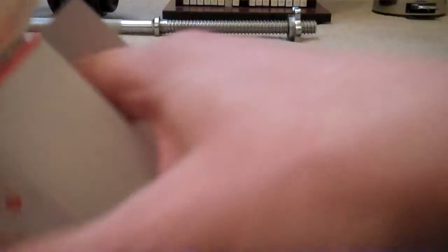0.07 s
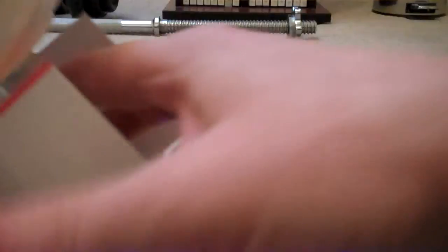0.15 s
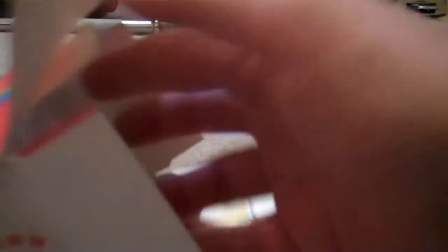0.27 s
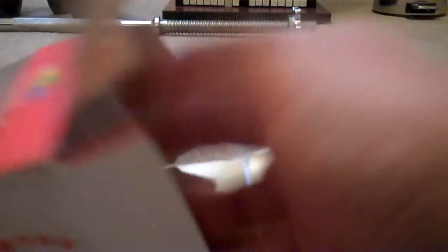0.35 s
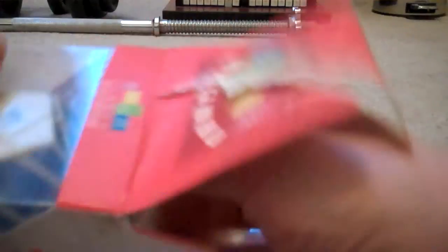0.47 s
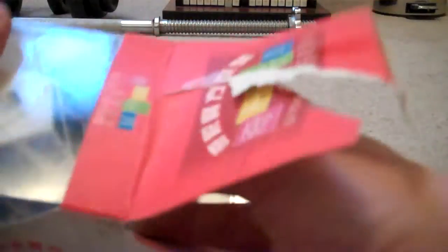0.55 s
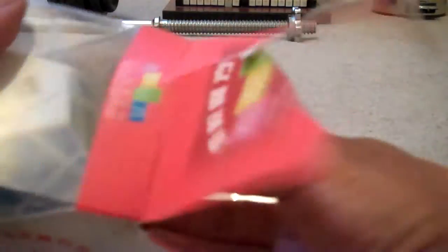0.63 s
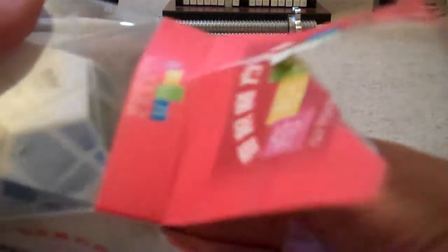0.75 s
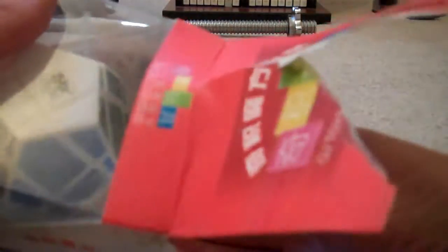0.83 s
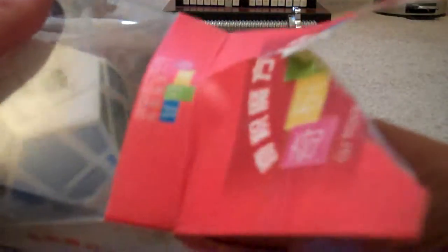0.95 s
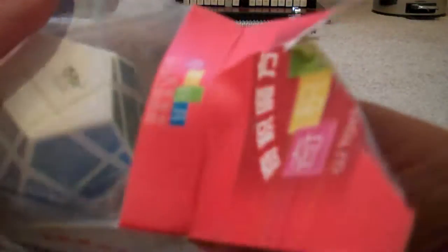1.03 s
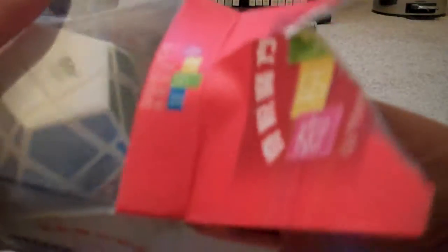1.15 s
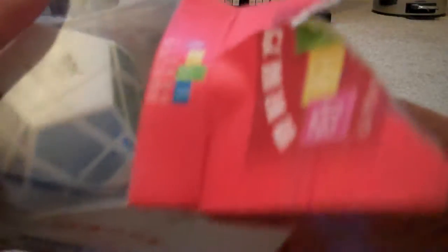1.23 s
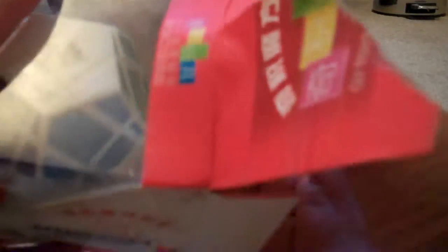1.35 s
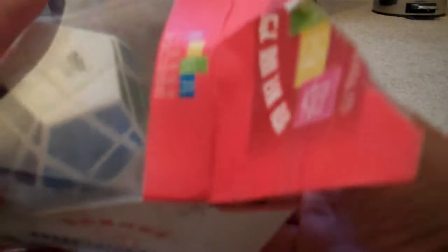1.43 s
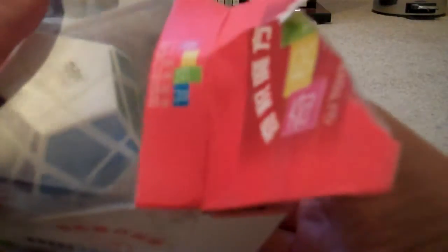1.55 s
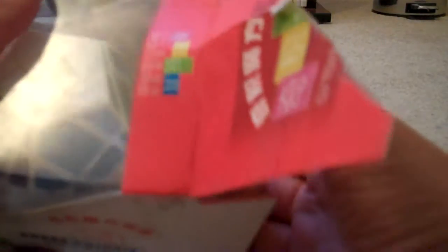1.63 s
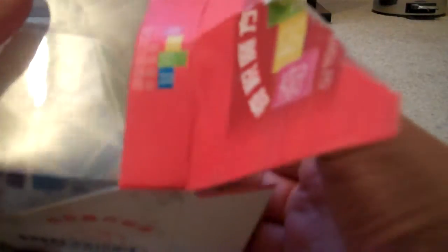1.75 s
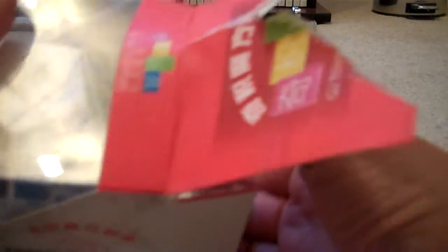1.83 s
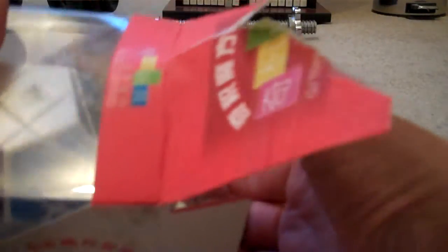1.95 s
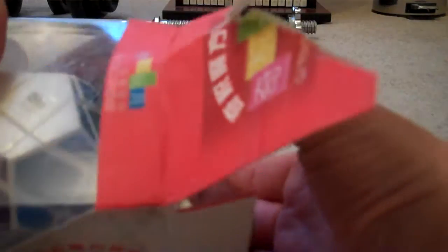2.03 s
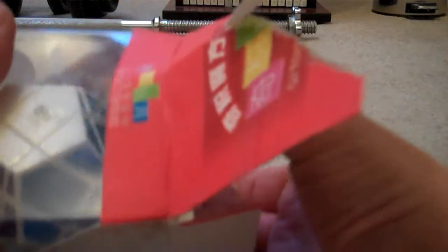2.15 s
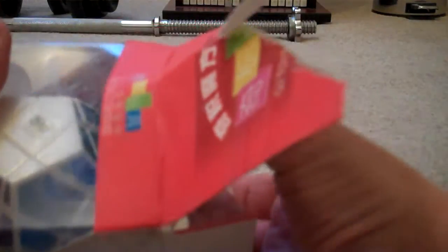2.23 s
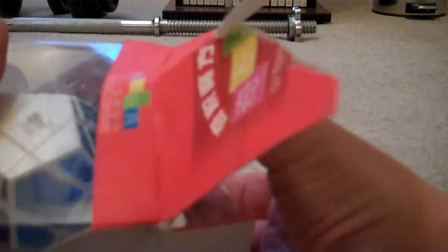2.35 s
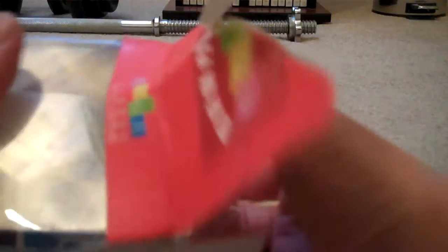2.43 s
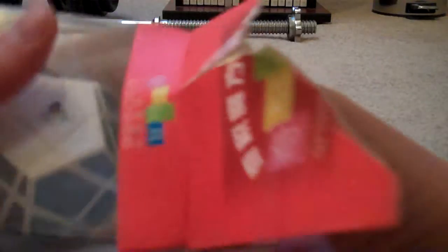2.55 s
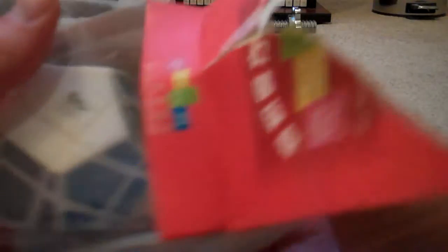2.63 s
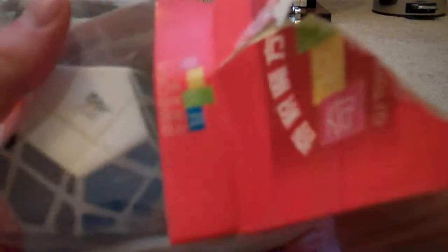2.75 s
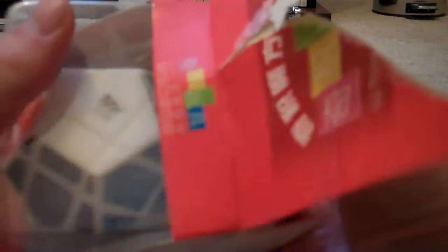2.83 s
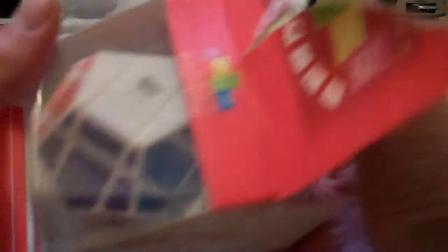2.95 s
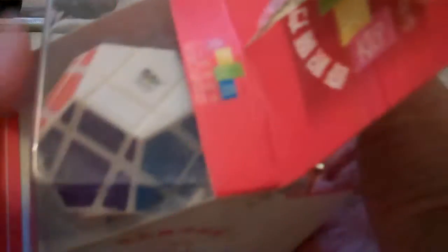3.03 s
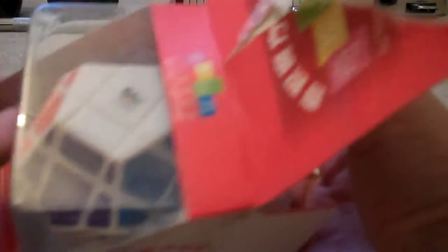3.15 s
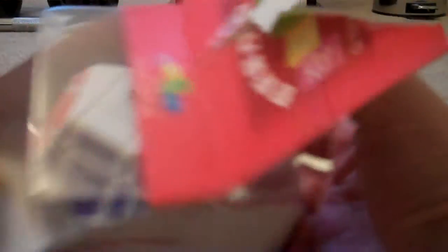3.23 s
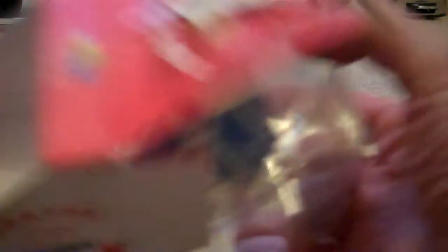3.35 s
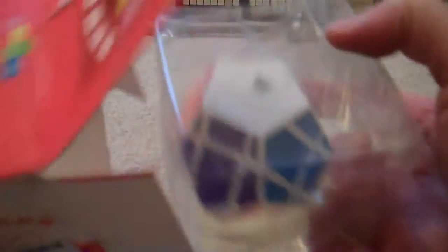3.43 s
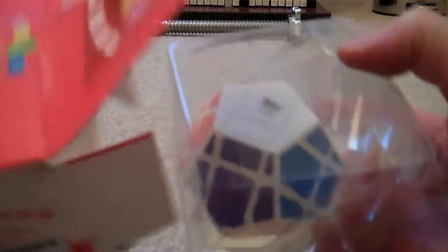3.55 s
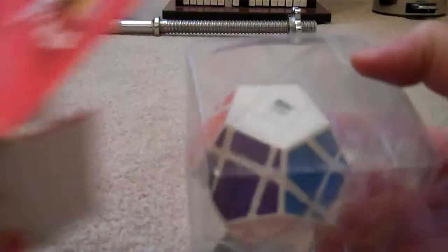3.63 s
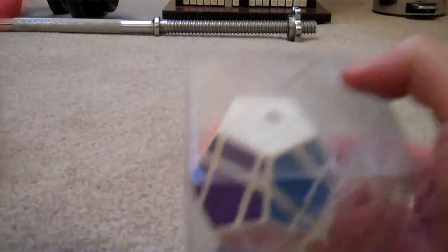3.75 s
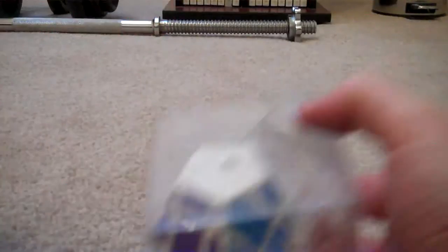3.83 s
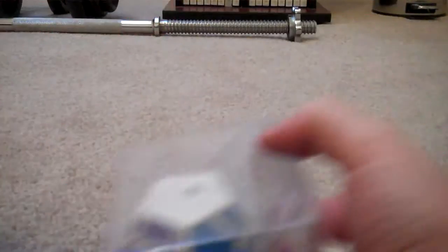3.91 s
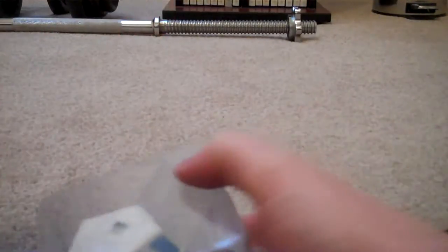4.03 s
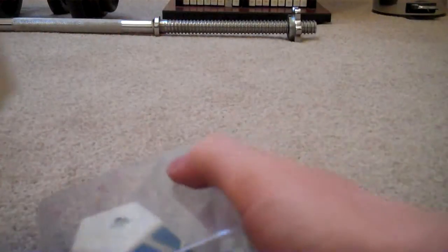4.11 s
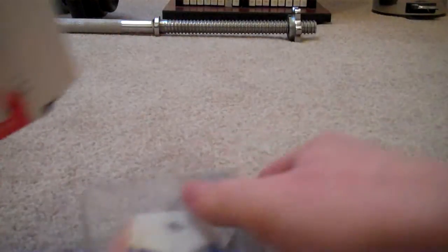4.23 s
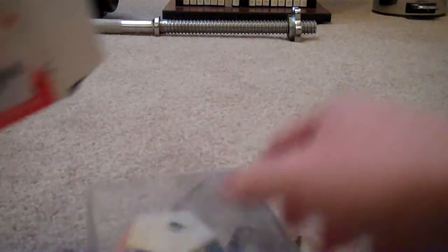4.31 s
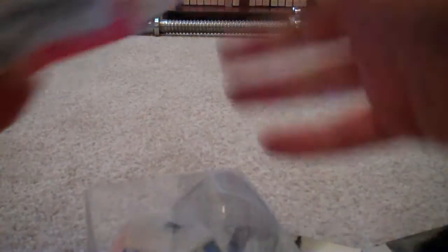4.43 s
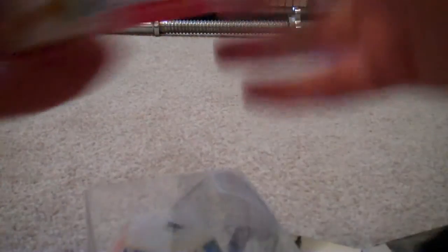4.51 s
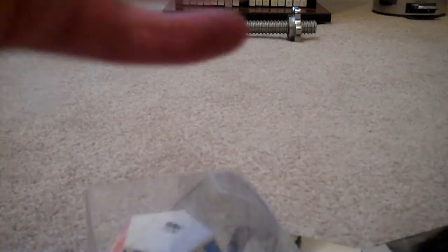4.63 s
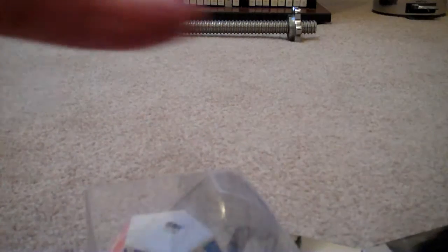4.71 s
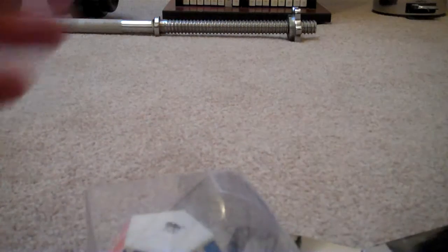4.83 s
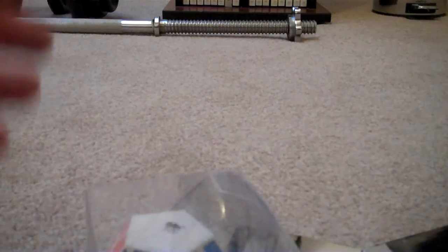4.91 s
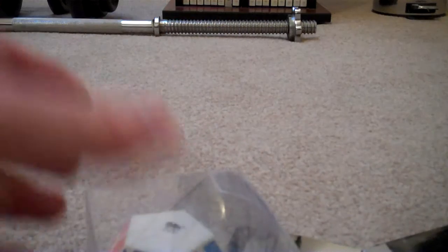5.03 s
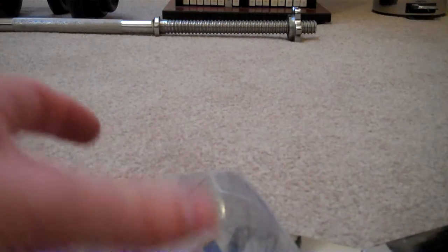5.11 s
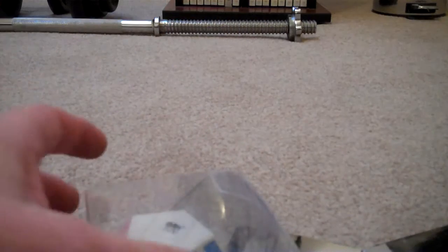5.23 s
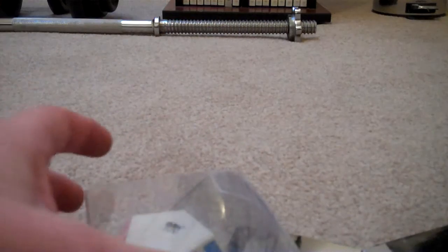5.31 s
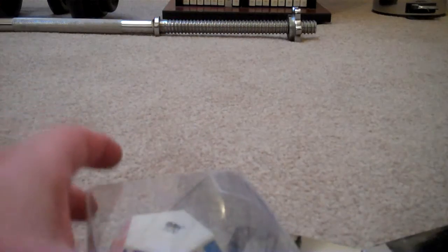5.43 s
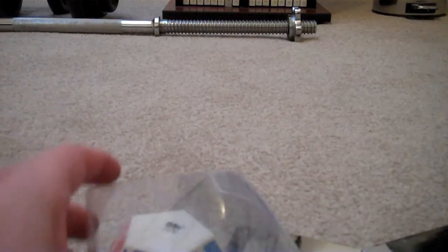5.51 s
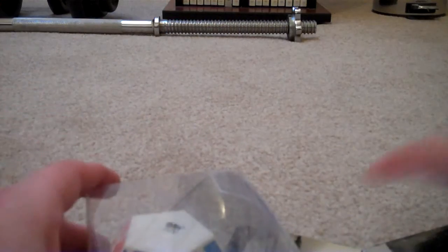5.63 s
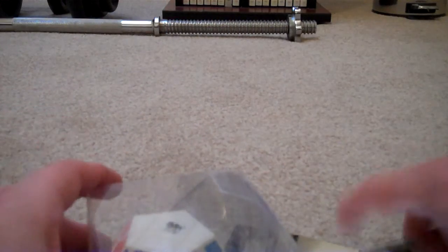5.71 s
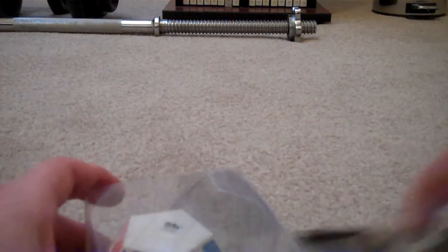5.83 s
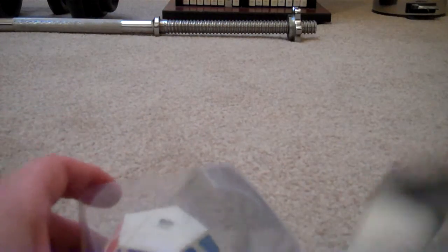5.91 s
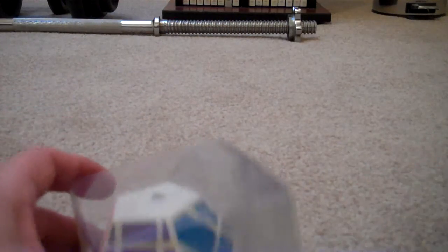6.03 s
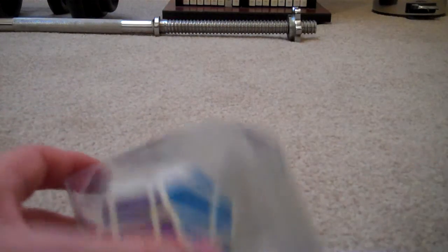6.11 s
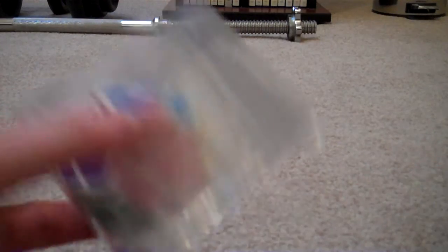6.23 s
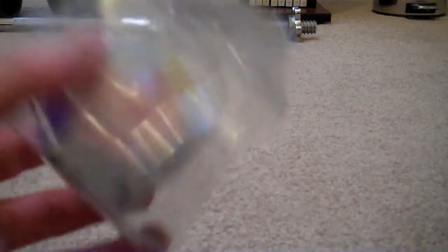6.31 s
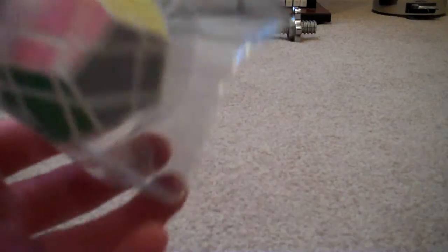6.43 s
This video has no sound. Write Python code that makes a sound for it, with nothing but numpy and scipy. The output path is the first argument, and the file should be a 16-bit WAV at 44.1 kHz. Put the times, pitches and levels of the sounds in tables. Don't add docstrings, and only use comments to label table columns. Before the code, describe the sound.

Very close to the microphone, a thin cardboard carton is pulled open with dense, sharp snaps and crackling over rustling card and plastic. The loudest cracks distort. After about three and a half seconds it quiets to scattered rustles and soft bumps on carpet, then fingers tap a stiff hollow plastic case, ending with hard raps in a small still room.

```python
import sys
import numpy as np
from scipy import signal
from scipy.fft import rfft, irfft, next_fast_len
from scipy.io import wavfile
from scipy.ndimage import uniform_filter1d, map_coordinates

SR = 44100
rng = np.random.default_rng(int(sys.argv[2]) if len(sys.argv) > 2 else 0)


def wrap_up_sound(samples):
    columns = np.atleast_2d(samples).T
    tamed = np.clip(columns, -1, 1)
    steps = np.round(tamed * 32767).astype(np.int16)
    wavfile.write(sys.argv[1], SR, steps)


def linear_from_db(decibels):
    return 10 ** (np.asarray(decibels, float) / 20)


N = 284886

# f/Hz, level per Hz/dB
STILL_COLOUR = [(30, -14), (150, -12.5), (1000, -19.5), (6000, -22.5), (9000, -25.5), (14500, -31.5)]
# f/Hz, t60/s
ROOM_DECAY = [(300, .22), (1000, 0.44), (10000, 0.13)]
# f/Hz, correlation
ALIKE = [(60, 0.11), (160, 0.81), (420, 0.91), (1120, 0.86), (2960, 0.65), (7850, 0.055)]
# t/s, peak level/dB
THUMPS = [
    (1.229, -29),
    (1.607, -14.5),
    (2.169, -16.5),
    (2.684, -27),
    (3.208, -31),
]
# t/s, peak level/dB, f/Hz
THUDS = [
    (3.41, -29, 173),
    (4.226, -28.5, 210),
    (4.278, -40, 167),
    (5.309, -40, 121),
]
# t/s, level/dB, f/Hz, width/Hz, rise/s, t60/s
RINGS = [
    (1.615, -20.5, 857, 200, 0.0053, 0.42),
    (2.175, -18.5, 986, 505, .004, 0.51),
    (4.43, -50, 2940, 250, .06, .4),
    (4.761, -36, 6220, 400, 0.037, 0.25),
]
# start t/s, end t/s, slip rate/Hz, level/dB
CREAK = (1.992, 2, 151, -20)
# t/s, peak level/dB, wall f/Hz, cavity relative level/dB, t60/s
TAPS = [
    (5.039, -30.5, 760, -8, .04),
    (5.086, -22, 670, -11, 0.045),
    (5.273, -28, 740, -5, 0.04),
    (5.309, -20.5, 731, -7.5, 0.086),
    (5.446, -18, 556, -8, 0.082),
    (5.576, -33, 640, -16, 0.072),
    (5.924, -6.5, 873, -19, 0.032),
    (6.331, -19, 760, -12, 0.056),
    (6.404, -9, 595, -5, 0.065),
]
# t/s, hiss level/dB, scrape level/dB, hollow level/dB
RUBBING = [(0.0, -22, -29.5, -50), (0.032, -22, -26, -27), (0.126, -42, -43.5, -47),
           (0.213, -42, -35, -48.5), (0.256, -46.5, -48, -63), (0.328, -27.5, -35, -46.5),
           (0.631, -28, -34, -37.5), (0.67, -23, -28.5, -51), (0.74, -29, -36.5, -37.5),
           (0.898, -30, -33.5, -45), (1.0, -17.5, -31, -41), (1.064, -28, -36, -40.5),
           (1.121, -20.5, -22.5, -26.5), (1.169, -33, -37.0, -45.5), (1.236, -37, -34.5, -42),
           (1.283, -39, -56, -43), (1.327, -28.5, -30, -32.0), (1.414, -36, -41, -45),
           (1.452, -31, -27.0, -22), (1.516, -38, -51, -55), (1.552, -29, -27, -31.0),
           (1.595, -29, -43, -47), (1.621, -25, -21, -26.5), (1.737, -36, -40.5, -50),
           (1.823, -22.5, -23.5, -46), (1.882, -35.5, -38, -38), (2.065, -19, -18.5, -40),
           (2.147, -29.5, -32.5, -36.5), (2.185, -19, -16.5, -25.5), (2.357, -34.5, -36, -49.5),
           (2.514, -20.5, -24.5, -28.5), (2.61, -44.5, -42.5, -48.5), (2.679, -27, -24.5, -31),
           (2.806, -25, -26, -38), (2.852, -10.5, -14.5, -50), (2.9, -29, -31.5, -35.5),
           (2.987, -22.5, -27, -45), (3.111, -38, -35, -40), (3.173, -32.5, -34, -45),
           (3.214, -30.5, -33, -31), (3.289, -19.5, -25, -51.5), (3.432, -17.5, -16.0, -22),
           (3.53, -40, -44.5, -48.5), (3.698, -49, -51, -53.5), (3.841, -56, -60, -70),
           (3.986, -42.5, -44.5, -49.5), (4.031, -43, -50.5, -53.5), (4.084, -30.5, -28.5, -30.5),
           (4.15, -40.5, -37.5, -43), (4.227, -27, -30.5, -30), (4.424, -49, -50, -55),
           (4.525, -39.5, -52, -62), (4.602, -17.5, -21, -37.5), (4.711, -47.5, -52, -61),
           (4.792, -29, -38.5, -47.5), (4.903, -52.5, -58, -56), (4.987, -50, -55.5, -59.0),
           (5.097, -31.5, -37, -41.5), (5.252, -45.5, -57, -58.0), (5.318, -37.5, -45, -29),
           (5.431, -53, -48, -55), (5.463, -34, -43.5, -37.5), (5.52, -47, -50.5, -41.5),
           (5.583, -36.5, -44, -38), (5.681, -58.5, -60.5, -61.5), (5.742, -39, -42, -34),
           (5.823, -33.0, -34, -49.0), (5.91, -42, -46.5, -63), (5.939, -38, -40.5, -43),
           (6.109, -60.5, -66, -60.5), (6.248, -35.5, -41, -56), (6.31, -56, -62, -67),
           (6.341, -37.5, -36, -38.5), (6.46, -38, -30.5, -26)]
# t/s, fizz level/dB, crack level/dB, crack f/Hz, hollow level/dB, length/ms
SNAPS = [(0.021, -16, -26, 2800, -45.5, 7.3), (0.0262, -4, -23, 3550, -45, 9),
         (0.0973, -21, -28, 2240.0, -41, 2), (0.443, -16, -32, 2540.0, -30.5, 3.1),
         (0.6186, -18, -46, 3570.0, -57, 3.4), (0.6539, -11, -37.5, 3790.0, -51, 7.9),
         (0.666, 1, -14, 3530, -18, 1.9), (0.6915, -12.5, -22, 2120, -37, 1.6),
         (0.7654, -10.5, -27, 1560, -43, 1.8), (0.8063, -20, -18.5, 1900, -31, 2.9),
         (0.9394, -18, -28, 2090, -23.5, 3.7), (0.9904, -10.5, -17.5, 3430, -52, 4.6),
         (1.078, -27, -28, 1860, -29.5, 4.2), (1.2268, -12.5, -11, 1740, -14.5, 6.05),
         (1.3076, -15.0, -8.0, 1720, -24, 3.4), (1.335, -13.5, -24, 1890.0, -41.0, 1.6),
         (1.34, -23.0, -18.5, 1740, -29, 4.6), (1.4332, -27, -31, 1720.0, -24.5, 6.1),
         (1.4489, -4.5, -7.5, 1940, -17, 4.8), (1.4699, -32, -22.5, 1850.0, -20.5, 8.5),
         (1.5158, -15.5, -21.5, 2000.0, -34, 2.3), (1.5428, -2, -5.5, 1350, -31, 6.6),
         (1.6088, -5.5, -3.5, 2310, -11.5, 6.1), (1.7679, -6, -18, 1920, -38.0, 2.9),
         (1.7772, -10, -32.0, 3250.0, -47.5, 2.2), (1.8161, -6, -23, 2880, -40, 6.4),
         (1.8304, -14, -20.5, 2690.0, -30, 2.4), (1.8385, -15, -21, 3190.0, -48, 1.6),
         (1.901, -14.5, -29, 2440, -58, 2.1), (1.9536, -19.5, -23.5, 2600, -32, 3.5),
         (1.966, -18, -38, 3790.0, -33, 3.5), (1.9846, -10, -39, 2630.0, -53, 1.6),
         (2.0017, -18, -21, 2530, -27, 2.7), (2.02, -11, -33, 2520.0, -40, 1.6),
         (2.051, 0.5, -11.5, 2000, -36, 2.5), (2.068, 2, -5, 3670, -15.5, 4.3),
         (2.1246, -15, -25, 2280.0, -21.5, 2.7), (2.1358, -15, -29.0, 2710.0, -38, 2.9),
         (2.15, -16, -22, 2670.0, -51, 1.6), (2.1672, -2.5, -4.5, 2060, -8.5, 8.1),
         (2.229, -13.5, -18.5, 1790.0, -43, 6), (2.2508, -11.5, -26, 2020.0, -35, 3.2),
         (2.2569, -10, -16, 2020, -42, 2.5), (2.2838, -5, -13, 1710, -23, 1.3),
         (2.2892, -21, -23.5, 1700.0, -29, 2.7), (2.296, -15.5, -30, 1960.0, -40.5, 3.7),
         (2.3835, -4, -15, 2320, -24, 1.3), (2.399, -22, -32, 2150.0, -56, 2.8),
         (2.4471, -21, -22.5, 2200, -30, 12), (2.4753, -8, -19, 3320, -41, 3.5),
         (2.4886, -14.0, -13, 2130, -36, 3.2), (2.5073, -16.5, -22, 2450.0, -29, 3),
         (2.6672, -31, -18.5, 2720, -24, 4), (2.6828, -6.5, -14.5, 2140, -14, 8.8),
         (2.7143, -16.5, -34.5, 2840.0, -41.5, 3.7), (2.7343, -31, -21.0, 2000, -44, 4.5),
         (2.7683, -19, -22.5, 2600, -34, 16), (2.8025, -13, -16, 3040, -25, 2.6),
         (2.834, -15, -19.0, 2320, -43, 8), (2.863, -21, -16.5, 2180, -27, 11),
         (2.8706, -4, -7.5, 2140, -26, 3.5), (2.9775, -19, -27, 1970, -37, 9.4),
         (3.0206, -33, -13.5, 2240, -17.5, 1.37), (3.0536, -33, -31.0, 2000.0, -40, 5.8),
         (3.07, -21.5, -28.5, 1990, -25.5, 8.7), (3.1105, -8.5, -25, 2930.0, -37.0, 2.9),
         (3.132, -12.5, -36, 3060.0, -54, 2.3), (3.1437, -23.0, -29, 3080.0, -46, 3.5),
         (3.1654, -13, -40, 2090.0, -49, 2.3), (3.1762, -12.5, -30, 2150.0, -50.5, 3.9),
         (3.2078, -7.5, -5, 2180, -10, 5.5), (3.307, -26, -15, 2500, -27.0, 4),
         (3.323, -23, -27, 2220.0, -31, 2.4), (3.3649, -14.5, -19, 2030, -27, 8.8),
         (3.3902, -32, -6.5, 2640, -27, 4.8), (3.4089, -18, -6, 1130, -23, 1.8),
         (3.4164, -32, -16.5, 1340.0, -23, 3.7), (3.427, -12, -16, 1310.0, -27, 2.5),
         (3.4366, -0.5, -13.5, 2400, -16.5, 5.9), (3.4435, -5.5, -8.5, 1760, -21, 6),
         (3.5655, -17, -37, 3500, -48.0, 1.5), (3.5785, -22, -34, 2110.0, -49.5, 3.6),
         (3.5925, -13, -24, 2200, -33, 3), (3.6555, -54, -35.5, 2230, -47.0, 2.2),
         (3.744, -36.5, -64, 3930, -63, 6.9), (4.035, -29, -34.5, 2950.0, -58.5, 3),
         (4.065, -20.5, -50, 2110.0, -38.5, 4.1), (4.1106, -45, -25.0, 1670, -30, 2.8),
         (4.2157, -3, -15, 2410.0, -27, 5.3), (4.2357, -15.5, -43, 1980.0, -44, 1.4),
         (4.2788, -21, -17.5, 2600, -24, 6.5), (4.5987, -38, -34, 2350, -48, 2.8),
         (4.6103, -32, -32, 2610.0, -37.5, 1.9), (4.6539, -23.5, -40, 1410, -54, 12),
         (4.7958, -40, -32.5, 2620, -43.0, 10.5), (4.839, -31.0, -41.5, 1120.0, -38.5, 8.6),
         (5.045, -18, -35, 2800.0, -43, 3.5), (5.0864, -20.5, -32.5, 2260, -31, 3.7),
         (5.14, -29, -47, 3420.0, -63, 3.0), (5.1767, -29.0, -53, 3470.0, -53, 2.1),
         (5.4625, -33, -55, 3340.0, -34, 8.9), (5.8864, -24, -36, 3640.0, -38.5, 3.0),
         (6.2394, -52, -36.5, 2000, -44.5, 4.4), (6.3297, -25, -27, 1760, -27.5, 2.7),
         (6.3755, -22.5, -43, 1780, -47, 2.6), (6.3989, -21.5, -30, 1890, -47, 3.1)]
# f/Hz, level per Hz/dB
FIBRES = [(2500, -19), (4000, -6.5), (6000, -1), (7600, 4), (9000, -8.5), (11000, -18.5), (14000, -23.5),
          (17000, -17)]
# f/Hz, width/Hz, level/dB
PANEL = [(1370, 820, -1.5), (1926, 505, 6.5), (3010, 2350, -1)]
# f/Hz, width/Hz, level/dB
CARTON = [(217, 96, -9.5), (359, 106, -4.5), (619, 263, -3), (886, 420, -2.5)]
# f/Hz, width/Hz, level/dB
DRUM = [(232, 130, -15.5), (371, 110, -8.5), (651, 102, -4.5), (872, 106, 2.5), (990, 220, -4)]
# f/Hz, width/Hz, level/dB
CASE = [(300, 53, -1.5), (624, 105, -2.5), (810, 120, 2.5)]
# f/Hz, width/Hz, level/dB
PORTS = [
    [(5400, 4100, -6), (7300, 4500, -30.5)],
    [(5750, 650, 11), (7570, 3000, 6)],
]


def unit(x):
    return x / np.sqrt(np.mean(x ** 2) + 1e-20)


def along(points, hz):
    f, v = np.transpose(points)
    return np.interp(np.log(hz + 1), np.log(f + 1), v)


def curves(rows):
    s, *cols = np.transpose(rows)
    return [np.interp(np.arange(N) / SR, s, c) for c in cols]


def lay(out, s, sound):
    start = max(round(s * SR), 0)
    out[..., start:][..., :sound.shape[-1]] += sound


def wobble(rate):
    return map_coordinates(rng.standard_normal(int(N * rate / SR) + 4), [np.arange(N) * rate / SR])


def resonances(modes):
    def response(f):
        total = 0
        for k, (hz, width, db) in enumerate(modes):
            damping = 1j * f * width
            total = total + (-1) ** k * linear_from_db(db) * damping / (hz * hz - f * f + damping)
        return total
    return response


def unit_gain(h):
    return h / np.sqrt(np.mean(np.abs(h) ** 2))


def filtered(x, response):
    m = next_fast_len(N + SR // 4)
    return irfft(rfft(x, m) * unit_gain(response(np.fft.rfftfreq(m, 1 / SR))), m)[..., :N]


def fibres(f):
    return linear_from_db(along(FIBRES, f))


def burst(count, rise_s, hold_s, t60):
    t = np.arange(count) / SR
    return (1 - np.exp(-(t / rise_s) ** 2)) * linear_from_db(-60 * np.maximum(t - hold_s, 0) / t60)


def ringing(noise, shape, hz, sharpness):
    ring = signal.lfilter(*signal.iirpeak(hz, sharpness, SR), noise * shape)
    return ring * np.linalg.norm(shape) * np.sqrt(2) / np.linalg.norm(ring)


def stillness():
    return linear_from_db(-55.5) * filtered(rng.standard_normal((2, N)), lambda f: linear_from_db(along(STILL_COLOUR, f)))


def room(x):
    out, step = np.zeros((2, N + SR)), SR // 4
    hz, t, z = signal.stft(rng.standard_normal((N // step + 1, 2, SR // 3)), SR, nperseg=256)
    tails = signal.istft(z * linear_from_db(-60 * t / along(ROOM_DECAY, hz)[:, None]), SR, nperseg=256)[1]
    for k, tail in enumerate(tails):
        piece = x[:, k * step:][:, :step]
        wet = signal.fftconvolve(piece, tail / np.linalg.norm(tail[0]), axes=1)
        lay(out, (k * step + 150) / SR, wet)
    return out[:, :N]


def thumps():
    out, u = np.zeros(N + SR), np.arange(SR // 20) / SR / 0.00056
    for s, db in THUMPS:
        lay(out, s, -linear_from_db(db + 17) * u * (1 - 0.1 * u) * np.exp(-u))
    return out[:N] * linear_from_db([[2.5], [-6]])


def thuds():
    out, t = np.zeros(N + SR), np.arange(SR // 8) / SR
    for s, db, hz in THUDS:
        envelope = linear_from_db(db + 8.5 - 60 * t / .12) * (1 - np.exp(-t / 0.0048))
        lay(out, s, envelope * np.sin(2 * np.pi * hz * t))
    return np.array([out[:N], 0.36 * np.roll(out[:N], 60)])


def rings():
    out, t = np.zeros((2, N + SR)), np.arange(SR // 3) / SR
    for s, db, hz, width_hz, rise_s, t60 in RINGS:
        edges = [hz - width_hz / 2, hz + width_hz / 2]
        band = signal.butter(2, edges, "bandpass", fs=SR, output="sos")
        tone = unit(signal.sosfilt(band, rng.standard_normal((2, 2 * len(t))))[:, len(t):])
        fade = linear_from_db(db - 60 * np.maximum(t - rise_s, 0) / t60)
        lay(out, s, fade * np.minimum(t / rise_s, 1) * tone)
    return out[:, :N]


def creak():
    start, end, rate, db = CREAK
    at = np.arange(start, end, 1 / rate)
    at = at + 0.00071 * rng.standard_normal(len(at))
    slips = np.bincount((at * SR).astype(int), linear_from_db(db + 2 * np.sin(at * SR)), N)
    ticks = signal.fftconvolve(slips, burst(SR // 100, rise_s=.0003, hold_s=.0006, t60=.006))[:N]
    return filtered(ticks * rng.standard_normal((2, N)), fibres)


def taps():
    out, t = np.zeros(N + SR), np.arange(SR // 4) / SR
    luck = rng.standard_normal((len(TAPS), 3))
    attack = 1 - np.exp(-t / .0006)
    for (s, db, wall_hz, cavity_db, t60), lucks in zip(TAPS, luck):
        fade = linear_from_db(-60 * t / np.clip(t60, .015, .15))
        wall = 0
        for ratio, gain, luck_db in zip((.78, 1, 1.1), (.5, .8, .15), lucks):
            wall = wall + gain * linear_from_db(luck_db) * np.sin(2 * np.pi * wall_hz * ratio * t)
        cavity = linear_from_db(cavity_db) * (np.sin(2 * np.pi * 290 * t) + .4 * np.sin(2 * np.pi * 405 * t))
        tick = 0.49 * linear_from_db(-60 * t / 0.0091) * np.sin(2 * np.pi * 1650 * t)
        lay(out, s, linear_from_db(db) * attack * fade * (wall + cavity + tick))
    no_bass = signal.butter(2, 170, "highpass", fs=SR, output="sos")
    small = signal.sosfilt(no_bass, out[:N])
    return np.array([small, -.25 * small])


def grit(rate, spread_db, t60):
    size = linear_from_db(spread_db * np.minimum(rng.exponential(size=N), 3))
    slips = (rng.random(N) < rate / SR) * size
    return unit(1 + signal.fftconvolve(slips, linear_from_db(-60 * np.arange(SR // 20) / SR / t60))[:N])


def patchy(noise, depth_db):
    z = signal.stft(noise, nperseg=256)[2]
    field = uniform_filter1d(rng.standard_normal(z.shape[1:]), size=7, axis=0)
    field = uniform_filter1d(field, size=6, axis=1)
    return unit(signal.istft(z * linear_from_db(depth_db * unit(field)), nperseg=256)[1][:, :N])


def crinkles(low_db, high_db, rate, spread_db):
    at, pitch, size, side = rng.random((4, round(rate * N / SR)))
    start, k = (at * N).astype(int), np.arange(128)
    hz = 1100 * linear_from_db(18 * pitch)
    cycles = hz[:, None] * k / SR
    level_db = np.where(hz < 3500, low_db[start], high_db[start]) - spread_db * np.log(size + 0.047)
    pop = linear_from_db(level_db)[:, None] * np.sin(2 * np.pi * cycles) * np.exp(-cycles / 1.85)
    where = (start[:, None] + k).ravel()
    shared = np.bincount(where, pop.ravel(), N + len(k))[:N]
    apart = np.bincount(where, (pop * (2 * side - 1)[:, None]).ravel(), N + len(k))[:N]
    return np.array([shared, apart])


def rustle():
    hiss_db, scrape_db, hollow_db = curves(RUBBING)
    pressure = wobble(30)
    fine = grit(rate=200, spread_db=3.5, t60=0.0064)
    coarse = grit(rate=70, spread_db=2, t60=0.028)
    noise = rng.standard_normal((3, 2, N))
    hiss_drive = patchy(noise[0], depth_db=1.5) * fine * linear_from_db(hiss_db + 0.3 + 1.2 * pressure)
    hiss = filtered(hiss_drive, fibres)
    scrape_drive = patchy(noise[1], depth_db=3.0) * coarse * linear_from_db(scrape_db - 0.87 + 1.6 * pressure)
    scrape = filtered(scrape_drive, resonances(PANEL))
    drive = noise[2] * coarse * linear_from_db(hollow_db - 1.33 + 1.4 * pressure)
    late = np.arange(N) > 4.95 * SR
    carton = filtered(drive * ~late, resonances(CARTON))
    case = filtered(drive * late, lambda f: resonances(CASE)(f) / (1 + (f / 1000) ** 6))
    pops = crinkles(scrape_db + 2, hiss_db + 1, rate=260, spread_db=4.5)
    return hiss + scrape + pops + carton + case


def snaps():
    fizz, crack, push = np.zeros((3, 2, N + SR))
    noise = rng.standard_normal((len(SNAPS), 3, 2, SR // 25))
    facet_hz = rng.uniform(4400, 7800, len(SNAPS))
    for (s, fizz_db, crack_db, crack_hz, hollow_db, ms), n, facet in zip(SNAPS, noise, facet_hz):
        shape = burst(n.shape[-1], rise_s=0.0008, hold_s=0.00083 * ms, t60=0.0053 + 0.0017 * ms)
        broad = np.clip(linear_from_db(1.6 * (fizz_db + 6)), 0, 1)
        coloured = 0.59 * (1 - broad) * ringing(n[0], shape, facet, 0.84)
        start = s - .0006
        lay(fizz, start, linear_from_db(fizz_db) * (broad * shape * n[0] + coloured))
        lay(crack, start, linear_from_db(crack_db + 4.24) * ringing(n[1], shape, crack_hz, 2.13))
        lay(push, start, linear_from_db(hollow_db + 3.16) * shape * n[2])
    return filtered(fizz[:, :N], fibres) + crack[:, :N] + filtered(push[:, :N], resonances(DRUM))


def placed(pair):
    def spread(hz):
        turn = np.arccos(np.clip(along(ALIKE, hz), -1, 1)) / 2
        return np.array([np.cos(turn), np.sin(turn)])
    shared, apart = filtered(pair, spread)
    return np.array([shared + apart, shared - apart]) / np.sqrt(2)


def scene():
    sharp = snaps() + creak() + taps() + thuds()
    wet = linear_from_db(-19.5) * room(sharp)
    return placed(sharp + wet + rings() + rustle() + stillness()) + thumps()


def low_pass(x):
    return signal.sosfilt(signal.butter(12, 14200, fs=SR, output="sos"), x)


def record(dry):
    ports = lambda f: np.array([1 + linear_from_db(-6) * resonances(p)(f) for p in PORTS])
    heard = linear_from_db(-0.44) * filtered(dry, ports)
    return low_pass(np.clip(heard, -.99, .99))


dry = scene()
out = record(dry)
wrap_up_sound(out)
```